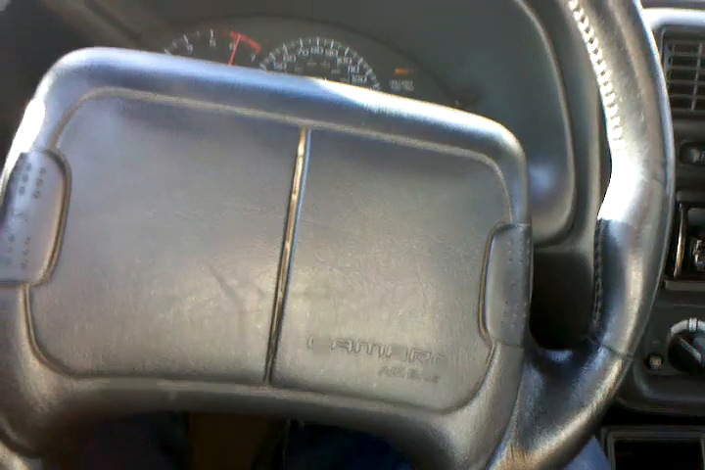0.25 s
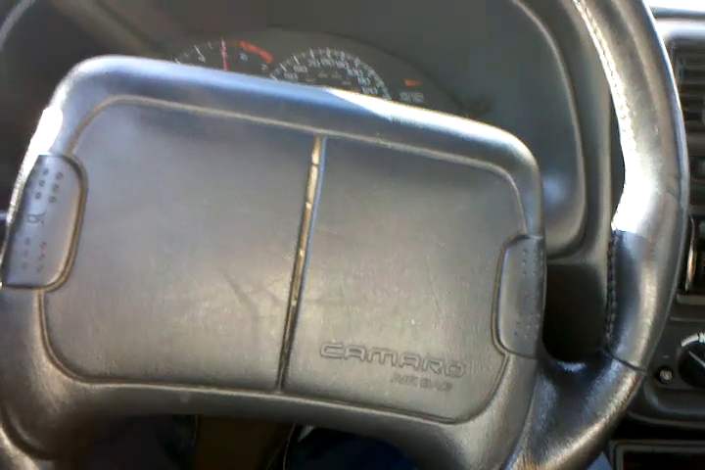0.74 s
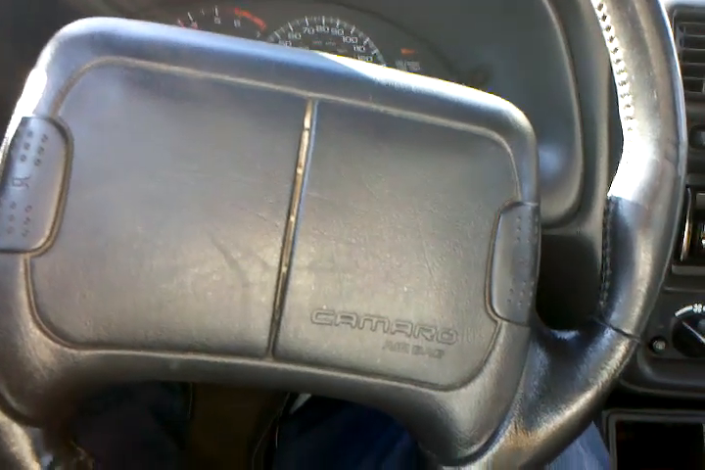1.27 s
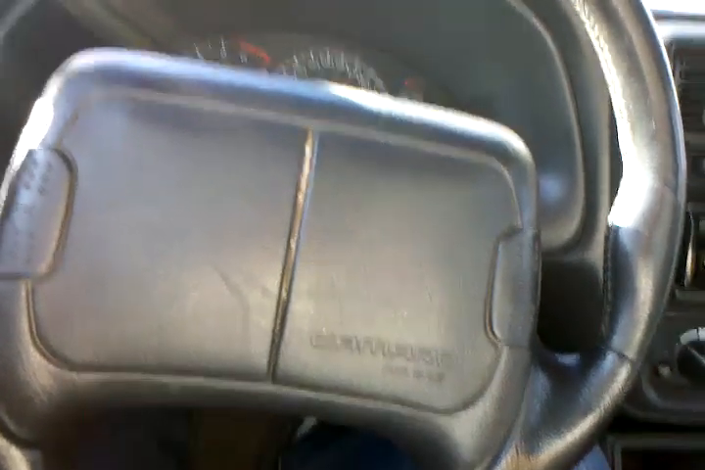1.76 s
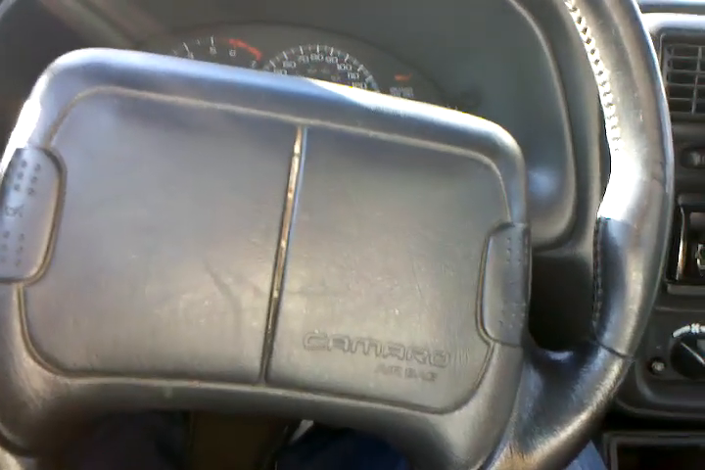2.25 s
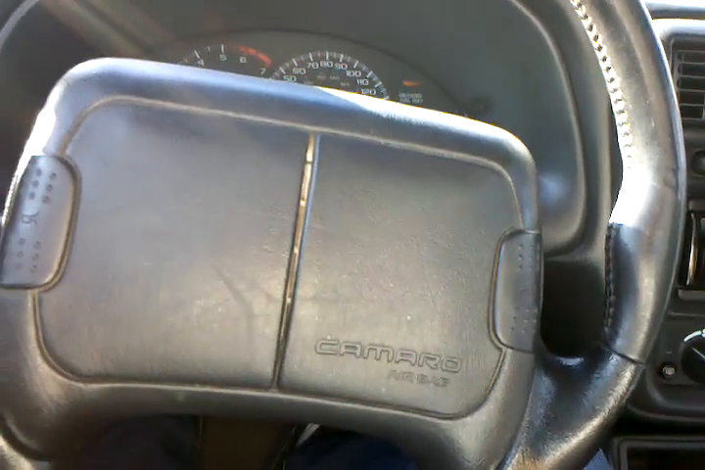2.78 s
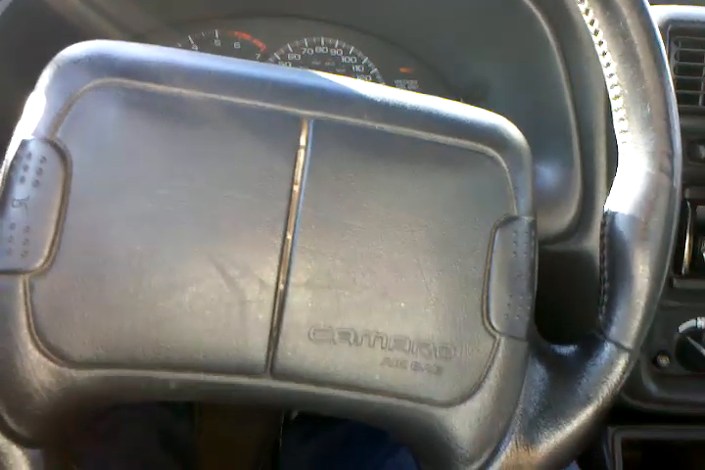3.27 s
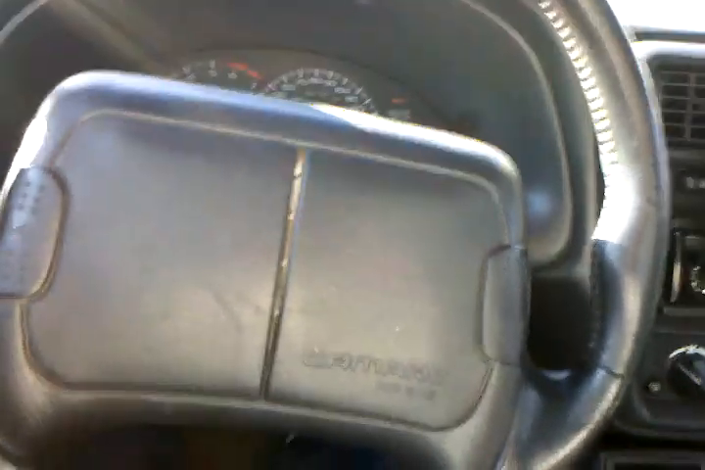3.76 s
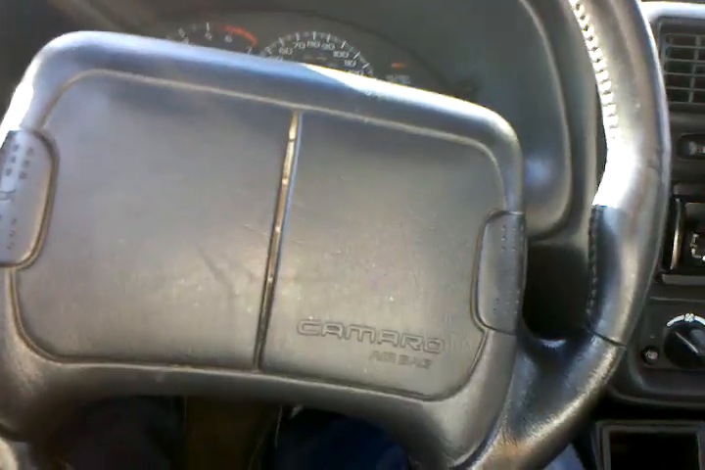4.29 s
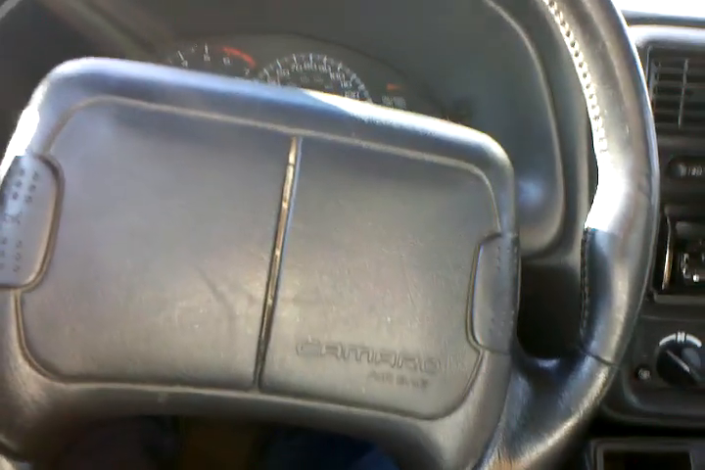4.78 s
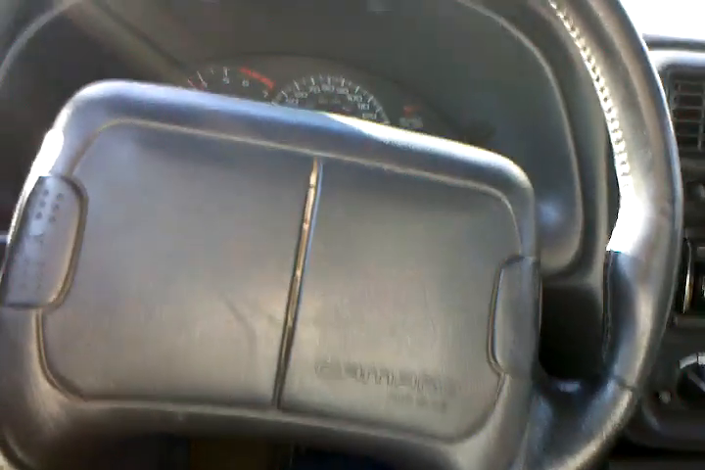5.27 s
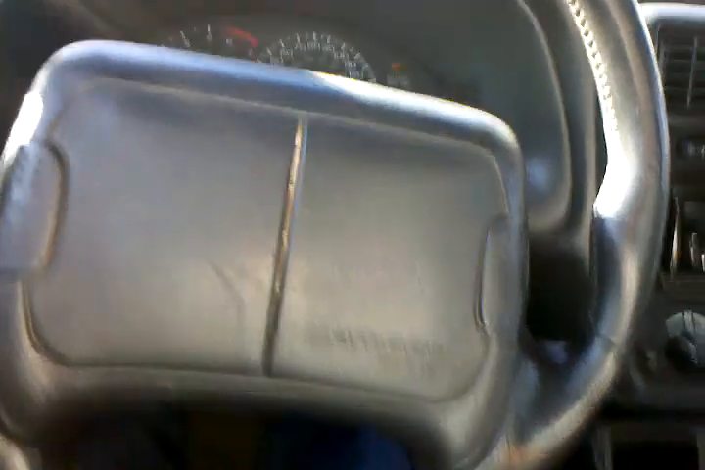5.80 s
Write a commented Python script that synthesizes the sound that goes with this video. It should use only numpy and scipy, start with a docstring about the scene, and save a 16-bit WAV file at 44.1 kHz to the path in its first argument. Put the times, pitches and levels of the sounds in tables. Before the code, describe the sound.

From inside a closed car, a booming V8 falls from high revs and is blipped twice more, sputtering and popping.

```python
"""From the driver's seat: a big V8 is revved hard, its exhaust pulses booming in the closed cabin while
the intake and engine bay hiss in time with the firings. The throttle snaps shut, unburnt fuel pops in
the pipe, and the revs sink to a lumpy idle with a floor drone and faint panel knocks. Two blips
follow: the first sputters with misfires, and each leaves a pop behind as the revs fall."""
import sys
import numpy as np
from scipy import signal
from scipy.fft import rfft, irfft
from scipy.io import wavfile
from scipy.ndimage import uniform_filter1d

SR = 44100
rng = np.random.default_rng(int(sys.argv[2]) if len(sys.argv) > 2 else 0)


def log_audio(samples):
    """Write samples as a 16-bit WAV file to the path given in sys.argv[1]."""
    # one column per channel
    frames = np.atleast_2d(samples).T
    # limit to full scale, then quantise
    limited = np.clip(frames, -1, 1)
    pcm = np.round(limited * 32767).astype(np.int16)
    wavfile.write(sys.argv[1], SR, pcm)


N = 266011
TIME = np.arange(N) / SR
BINS = np.fft.rfftfreq(16384, 1 / SR)

# Stabs of the pedal. Engine speed is in cycles per second: one cycle = two crank turns = eight firings.
# opens_s, opening_time_s, shuts_s, opening (0-1), surge_db, peak_s, peak_speed_hz
REVS = [(-0.21, 0.04, 0.43, 0.9, 0, 0.43, 56.9), (3.76, 0.04, 4.12, 1.0, 1.5, 4.14, 31.1),
        (4.9, 0.3, 5.26, 0.72, 7, 5.33, 31.0)]
# Strength of each cylinder's puff, in firing order: level_db
CYLINDERS = [-9, 7.5, 4.5, 0.5, 0, 9.5, -16, 3]
# Tone of the exhaust pipe and cabin together: frequency_hz, level_db
CABIN = [(28, -50.5), (42, -33), (54, -21.5), (72, -21.5), (100, -15.5), (150, -11), (200, -13.5),
         (235, -20), (320, -24.5), (430, -32.5), (660, -32), (780, -37.5), (1100, -43), (2400, -55.5)]
# Tone of the rush of air and valve gear: frequency_hz, level_db
HISS = [(150, -31), (400, 4), (560, 14), (780, -1.5), (1000, 7.5), (1450, 3), (1900, 3), (2300, -1),
        (3000, -1), (3700, -0.5), (5000, -2), (6200, -2.5), (7000, -2)]
# Resonances of the engine bay: pitch_hz, width_hz, lift_db
BAY_RESONANCES = [(526, 39, 6), (957.5, 40, 8), (1066, 45, 6.5), (1217, 25, 5), (1847, 130, 6.5),
                  (2510, 23, 6), (2955, 37, 8.5), (3323, 52, 9.5), (3510, 34, 5), (3667, 78, 10.5),
                  (3960, 45, 3.5), (4340, 45, 9), (4797, 75, 7.5), (5140, 85, 4.5), (5580, 34, 10.5),
                  (5926, 130, 6.5), (6920, 69, -1.5)]


def amp(db):
    """Decibels to gain."""
    return 10 ** (np.asarray(db) / 20)


def unit(x):
    """Scales to rms 1."""
    return x / np.sqrt(np.mean(x ** 2) + 1e-20)


def response(points, peaks=()):
    """An EQ curve in dB at BINS: a smooth spectrum with resonances on top."""
    hz, db = np.transpose(points)
    smooth = np.interp(np.log(BINS + 1), np.log(hz), db)
    return smooth + sum(lift / (1 + (2 * (BINS - f) / width) ** 2) for f, width, lift in peaks)


def colour(x, db):
    """Applies an EQ curve as a causal filter, so that resonances ring after each pulse."""
    log_gain = np.log(amp(np.r_[db, db[-2:0:-1]]))
    taps = np.fft.ifft(np.exp(np.conj(signal.hilbert(log_gain)))).real
    return signal.oaconvolve(x, taps[:len(taps) // 2])[:len(x)]


def drift(rate_hz):
    """A smooth random wander of rms 1 at about the given rate."""
    knots = rng.standard_normal(2048)
    return unit(np.interp(TIME * rate_hz, np.arange(len(knots)), knots))


def steady(x, span_s=0.22):
    """Rides the level to rms 1 over every short span, keeping the faster throb."""
    size = int(span_s * SR)
    power = uniform_filter1d(uniform_filter1d(x ** 2, size), size // 2)
    return x / np.sqrt(abs(power) + 1e-14)


def split(x, hz):
    """A crossover: the parts below and above a frequency."""
    low = signal.sosfiltfilt(signal.butter(4, hz, fs=SR, output="sos"), x)
    return low, x - low


def firing_envelope(cycles, decay):
    """Jumps to 1 at each firing and dies away; decay is a share of the gap between firings."""
    return np.exp(-(len(CYLINDERS) * cycles % 1) / decay)


def pedal(delay_s=0, shut_s=0.011, rise_s=0.026, fade_s=0.26, fuel_cut_db=-3):
    """Throttle (0-1) of each stab, and the note's surge as fuel comes on and sag as it is cut (dB)."""
    throttle, lift_db = 0, 0
    for opens_s, opening_time_s, shuts_s, opening, surge_db, _, _ in REVS:
        age = np.maximum(TIME - delay_s - opens_s, 0)
        shut_for = np.maximum(TIME - delay_s - shuts_s, 0)
        held = np.exp(-shut_for / shut_s)
        surge, sag = ((1 - np.exp(-t / rise_s)) * np.exp(-t / fade_s) for t in (age, shut_for))
        throttle += opening * (1 - np.exp(-age / opening_time_s)) * held
        lift_db += surge_db * surge * held + fuel_cut_db * sag
    return throttle, lift_db


def engine_speed(pickup_s, idle_hz=10.4, coast_per_s=0.671, knee=5):
    """Revs climb straight under throttle, then friction takes a steady share a second down to idle."""
    speed = np.full(N, idle_hz)
    for opens_s, *_, peak_s, peak_hz in REVS:
        start_s = opens_s + pickup_s
        climb = np.interp(TIME, (start_s, peak_s), (np.interp(start_s, TIME, speed), peak_hz))
        coast = peak_hz * np.exp(-coast_per_s * (TIME - peak_s))
        settle = (coast ** knee + idle_hz ** knee) ** (1 / knee)
        speed = np.select([TIME < start_s, TIME < peak_s], [speed, climb], settle)
    return uniform_filter1d(speed, size=2205)


def fader(speed, throttle, mid_db, doubling_db, open_db, open_doubling_db, mid_hz=30):
    """A layer's gain: a level at mid revs and a slope per doubling of speed; throttle shifts both."""
    doublings = np.log2(speed / mid_hz)
    return amp(mid_db + doubling_db * doublings + throttle * (open_db + open_doubling_db * doublings))


def exhaust_note(speed, cycles, throttle, cabin, top_harmonic=43, upper_db=-2):
    """Harmonics of the engine cycle swell as they sweep through the cabin's resonances."""
    # Low harmonics of the exhaust pulses: harmonic, throttle_shut_db, throttle_open_db
    low_harmonics = [(1, -41.5, -28), (2, -12, -4.5), (3, -5, -5.5), (4, -13.5, -15), (5, 3, 3.5),
                     (6, -2, 0), (7, -23, -9), (8, 3.5, 7), (9, -0.5, -6.5), (10, -7.5, -14.5),
                     (11, -3.5, -8.5), (12, -0.5, -5.5), (13, -15, 3), (14, 0.5, 5), (15, -13, -10.5),
                     (16, 5.5, 9.5)]
    upper_harmonics = [(k, upper_db, upper_db) for k in range(len(low_harmonics) + 1, top_harmonic + 1)]
    note = np.zeros(N)
    for k, shut_db, open_db in low_harmonics + upper_harmonics:
        gain = amp(shut_db + (open_db - shut_db) * throttle + np.interp(k * speed, BINS, cabin))
        phase = 2 * np.pi * (k * cycles + rng.random())
        waver = min(0.05 + 0.016 * k, 0.5)  # cycle-to-cycle scatter unsettles high harmonics most
        note += gain * np.exp(waver * drift(14)) * np.cos(phase + waver * drift(28))
    return note


def burble(cycles, firing, cabin, lope=0.15, gush_gain=0.13, blunt_hz=420, low_cut_hz=85):
    """Too strong or weak firings, by cylinder and by chance, thump the cabin with a turbulent gush."""
    strength = np.clip(rng.standard_normal(4096), -1.5, 1.5) + lope * np.resize(CYLINDERS, 4096)
    kicks = split(np.diff(firing, prepend=0) * strength[firing], blunt_hz)[0]
    gush = gush_gain * firing_envelope(cycles, decay=0.29) * rng.standard_normal(N)
    low_cut = signal.butter(3, low_cut_hz, "high", fs=SR, output="sos")
    return signal.sosfilt(low_cut, colour(kicks + gush, cabin))


def engine_hiss(cycles, firing, throttle):
    """Air rushes in a puff for each cylinder and rings in the engine bay; an open throttle adds rasp."""
    scatter_db = (4.5 + 2.0 * throttle) * rng.standard_normal(4096)[firing]
    strength = amp(np.take(CYLINDERS, firing % len(CYLINDERS)) + scatter_db)
    puffs = unit(strength * firing_envelope(cycles, decay=0.55))
    depth = 0.2 + 0.054 * throttle
    air = (1 - depth + depth * puffs) * rng.standard_normal(N)
    hiss = colour(air, response(HISS, BAY_RESONANCES))
    treble = split(split(hiss, hz=1400)[1], hz=7000)[0]  # this band sets the level
    mid, top = split(hiss / np.std(treble), hz=3300)
    return amp(-1.5 * throttle) * mid + amp(2.6 * throttle) * top  # brighter as the throttle opens


def intake_whistle(speed, throttle, pitch_hz=3675, width_hz=110, flutter=0.16):
    """A breathy, fluttering whistle that comes up with the air flow through the open throttle."""
    band = np.exp(-((np.fft.rfftfreq(N, 1 / SR) - pitch_hz) / width_hz) ** 2)
    breath = irfft(rfft(rng.standard_normal(N)) * band, N)
    flow = throttle * speed / speed.max()
    return amp(-9) * flow * unit(breath * np.exp(flutter * drift(52)))


def exhaust_pops(flare_rise_s=0.009, flare_tail_s=0.012, thump_rise_s=0.0092, crackle=0.16):
    """Fuel flares in the pipe: a ragged crack that sets the pipe ringing, then a thump in the cabin."""
    # Misfires and pops: start_s, flare_db, length_s, thump_db, thump_pitch_hz, thump_delay_s
    pops = [(1.838, -20.5, 0.012, -21.5, 206, 0.0062), (3.761, -44.5, 0.042, -55, 161, .006),
            (3.881, -43, 0.026, -14.5, 164, 0.0046), (3.945, -34, 0.021, -45, 163, 0.0021),
            (4.075, -18.5, 0.013, -17, 160, 0.0037), (4.125, -35, 0.01, -19, 161, 0.0022),
            (4.605, -23, 0.03, -13, 129.5, 0.013), (5.766, -25.5, 0.027, -8.5, 152, .016)]
    # What the pipe rings with after a pop: pitch_hz, width_hz, lift_db
    pipe_resonances = [(210, 54, 18.5), (288, 77, 32), (504, 19, 17), (691, 35, 12), (970, 35, 9.5),
                       (1115, 40, -8), (1850, 110, 17.5), (3700, 150, 13)]
    flare, out = np.zeros(N), np.zeros(N)
    for start_s, flare_db, length_s, thump_db, thump_hz, delay_s in pops:
        age = np.maximum(TIME - start_s, 0)
        release = np.exp(-np.maximum(age + flare_tail_s - length_s, 0) / flare_tail_s)
        flare += amp(flare_db) * np.minimum(age / flare_rise_s, 1) * release
        thump_age = np.maximum(age - delay_s, 0)
        swell = thump_age / thump_rise_s * np.exp(1 - thump_age / thump_rise_s)
        out += amp(thump_db) * swell * np.sin(2 * np.pi * thump_hz * thump_age)
    gas = rng.standard_normal(N) * np.exp(crackle * drift(300))
    crack, ring = response(HISS, BAY_RESONANCES), response(CABIN, pipe_resonances)
    for tone, gain_db in ((crack, 5.5), (ring, 0)):
        out += amp(gain_db) * colour(flare * gas, tone) / np.std(colour(gas, tone))
    return out


def floor_drone(speed, cycles, throttle, harmonic=3, resonance_hz=57, width_hz=20, level_db=-38):
    """With the throttle shut, a low engine harmonic shakes the floor pan as it passes its resonance."""
    swell = 1 / (1 + (2 * (harmonic * speed - resonance_hz) / width_hz) ** 4)
    return amp(level_db) * swell * (1 - throttle) * np.sin(2 * np.pi * harmonic * cycles)


def panel_knocks(rise_s=0.0017, decay_s=0.028, spread=0.12):
    """Each knock rings three close modes of a loose panel."""
    # Small knocks in the cabin at low revs: start_s, level_db, pitch_hz
    knocks = [(1.973, -52, 1060), (2.136, -42.5, 1084), (2.747, -51, 1840), (3.644, -50.5, 1010)]
    out = np.zeros(N)
    for start_s, level_db, pitch_hz in knocks:
        age = np.maximum(TIME - start_s, 0)
        modes_hz = [pitch_hz * (1 + spread * k) for k in (-1, 0, 1)]
        ring = sum(np.sin(2 * np.pi * (hz * age + rng.random())) for hz in modes_hz)
        out += amp(level_db) * (1 - np.exp(-age / rise_s)) * np.exp(-age / decay_s) * ring
    return out


def valve_gear(cycles, level_db=-66):
    """Tappets rustle once a firing and ring two metal parts, so faintly that only idle uncovers them."""
    taps = firing_envelope(cycles, decay=0.43) * rng.standard_normal(N)
    metal = response([(500, -60.5), (1800, -21), (3400, -29), (7000, -55.5)],
                     peaks=[(1840, 140, 10), (3430, 60, 19)])
    return amp(level_db) * unit(colour(taps, metal))


def scene(pickup_s=0.05, crossover_hz=280, lumpy_hz=14.8, lumpy_share=0.4):
    """The pedal sets the engine's speed; the intake answers it at once, the exhaust a moment later."""
    # Booming resonances of the cabin and pipe: pitch_hz, width_hz, lift_db
    cabin_resonances = [(116, 14, 7), (160.3, 25.5, 12), (196.5, 12, 7.5), (312, 44, 0), (507.5, 75, 12.5),
                        (660, 19, 8), (873, 79, 9), (1040, 45, -0.5)]
    cabin = response(CABIN, cabin_resonances)
    throttle, _ = pedal()
    load, lift_db = pedal(delay_s=pickup_s)
    speed = engine_speed(pickup_s)
    cycles = np.cumsum(speed) / SR
    firing = (len(CYLINDERS) * cycles).astype(int)  # running count of firings
    boom, bark = split(exhaust_note(speed, cycles, load, cabin), crossover_hz)
    throb, rasp = split(burble(cycles, firing, cabin), crossover_hz)
    note = fader(speed, load, -14, 13.5, -6.5, -3) * boom + fader(speed, load, -11.5, 15.5, -2, -8) * bark
    evenness = 1 - lumpy_share / (1 + (speed / lumpy_hz) ** 10)  # the clean note gives way near idle
    mix = evenness * amp(lift_db) * note
    mix += fader(speed, load, -27, 6.5, 5.5, -4) * steady(throb)
    mix += fader(speed, load, -32.5, 10.5, 7, -5) * steady(rasp)
    mix += exhaust_pops() + floor_drone(speed, cycles, load) + panel_knocks() + valve_gear(cycles)
    intake = engine_hiss(cycles, firing, throttle) + intake_whistle(speed, throttle)
    mix += fader(speed, throttle, -34.5, 16, 7.5, -5.5) * intake
    return mix[None]


def record(dry, soft_ceiling=0.8, clip_level=0.76, band_limit_hz=15850):
    """A small microphone rounds off loud peaks and dulls the top; the tallest clip, then a band limit."""
    # The microphone's treble roll-off: frequency_hz, level_db
    mic_treble = [(6950, 0), (7250, -13.5), (7550, -21), (7850, -33), (9000, -37.5), (9400, -79.5)]
    rounded = dry[0] / (1 + (dry[0] / soft_ceiling) ** 8) ** (1 / 8)
    clipped = np.clip(colour(rounded, response(mic_treble)), -clip_level, clip_level)
    low_pass = signal.firwin(511, band_limit_hz, window=("kaiser", 9), fs=SR)
    return signal.oaconvolve(clipped, low_pass, "same")[None]


dry = scene()
out = record(dry)
log_audio(out)
```